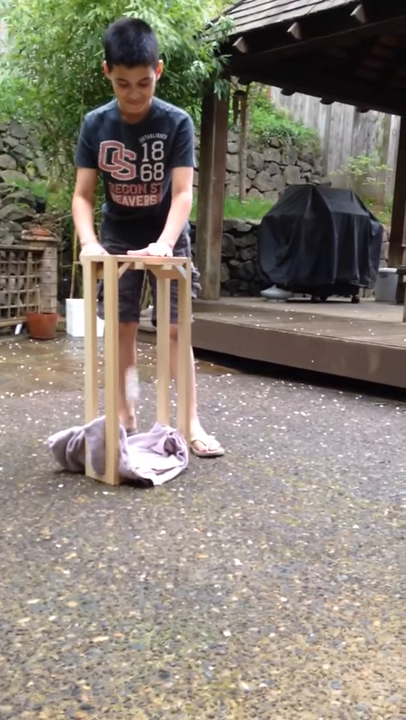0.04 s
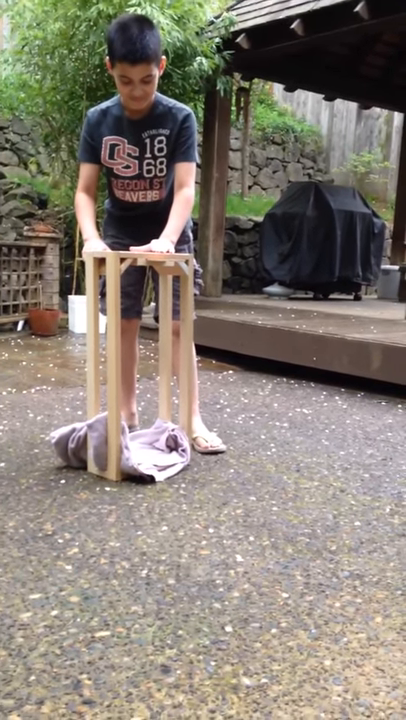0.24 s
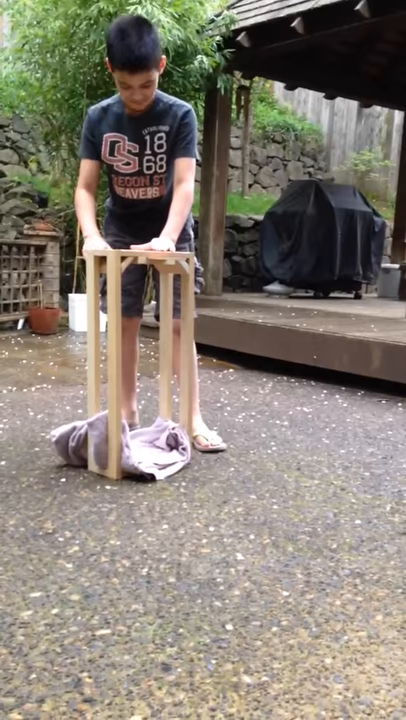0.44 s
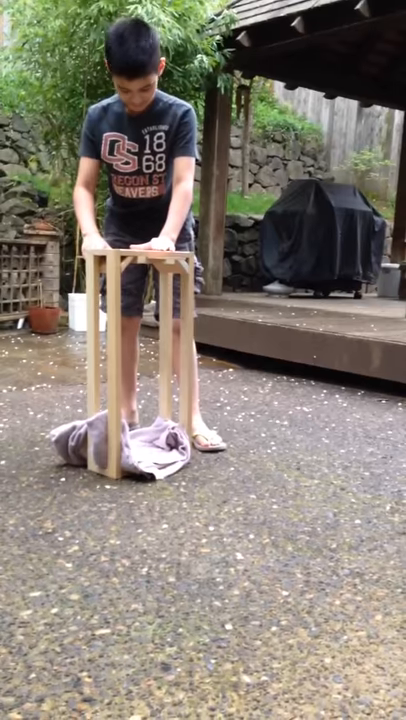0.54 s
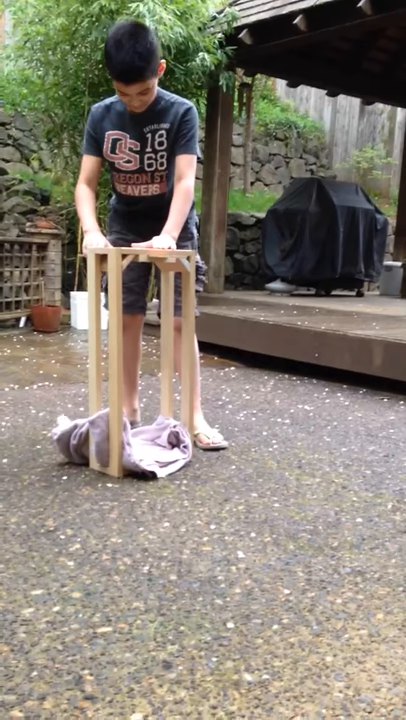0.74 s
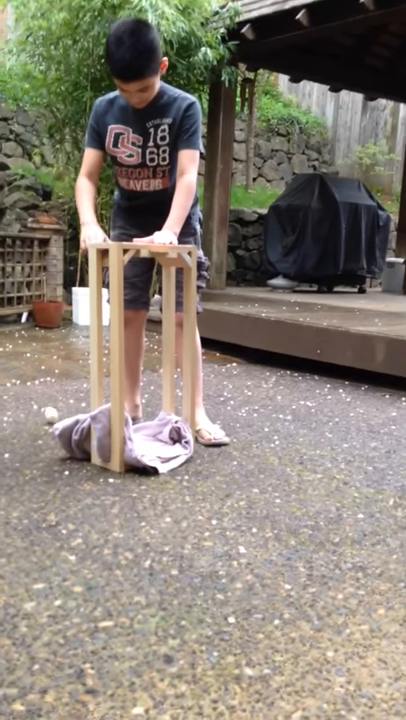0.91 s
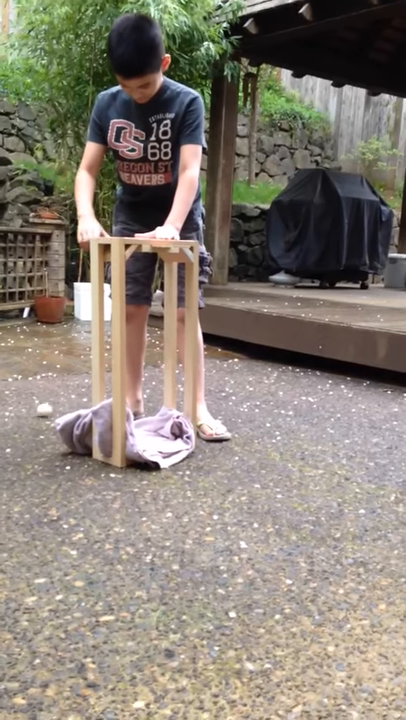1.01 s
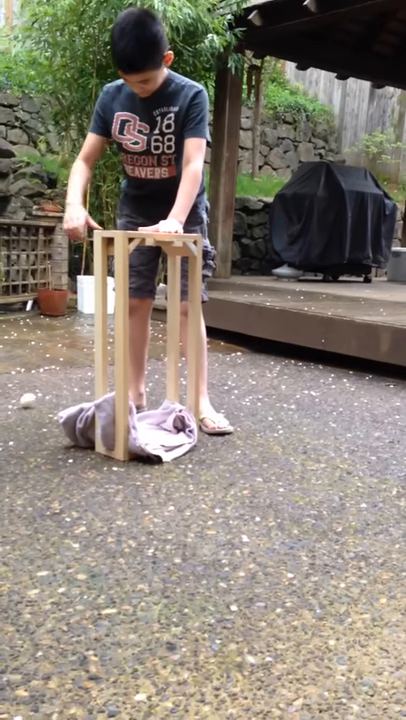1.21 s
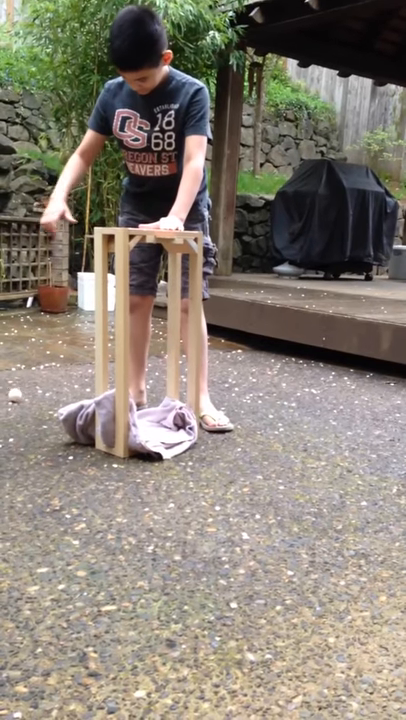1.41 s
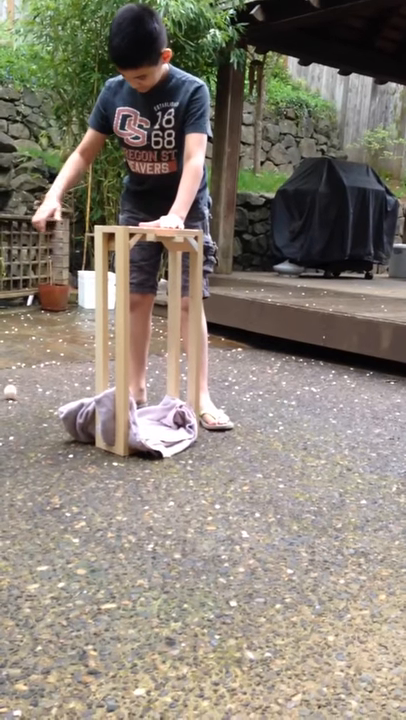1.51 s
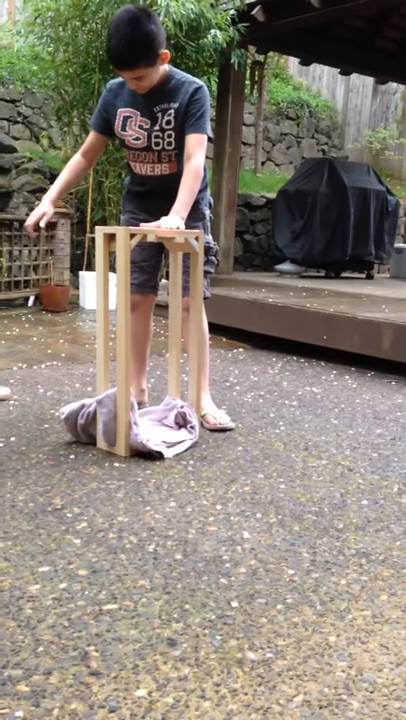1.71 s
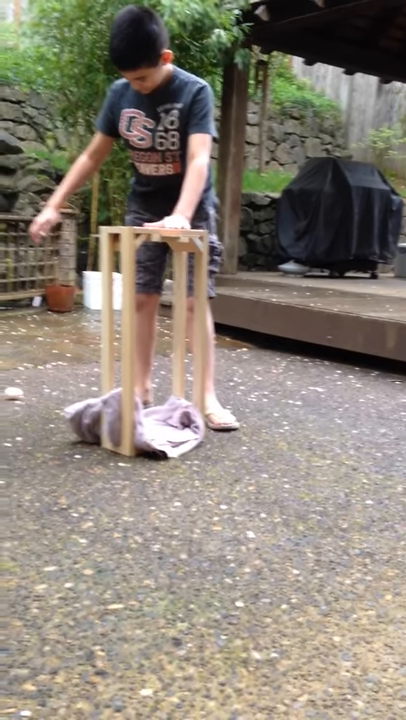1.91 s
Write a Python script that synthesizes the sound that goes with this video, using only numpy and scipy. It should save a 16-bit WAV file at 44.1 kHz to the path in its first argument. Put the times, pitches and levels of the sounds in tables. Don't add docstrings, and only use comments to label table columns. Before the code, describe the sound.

An egg drops through a wooden frame onto a towel with one loud, dull woody knock, then bounces with a bright gritty crack and rolls off over rough patio in fainter ticks, heard outdoors by one microphone.

```python
import sys
import numpy as np
from scipy import signal
from scipy.io import wavfile

SR = 44100
rng = np.random.default_rng(int(sys.argv[2]) if len(sys.argv) > 2 else 0)


def file_out(sig):
    cols = np.atleast_2d(sig).T
    lim = np.clip(cols, -1, 1)
    pcm = np.round(lim * 32767).astype(np.int16)
    wavfile.write(sys.argv[1], SR, pcm)


def volts(x):
    e = np.asarray(x, float) / 20
    return 10 ** e


N = 85995


def in_time(rows):
    t_s, *columns = np.transpose(rows)
    return [np.interp(np.arange(N) / SR, t_s, column) for column in columns]


def rms_one(x):
    return x / np.sqrt(np.mean(x ** 2) + 1e-20)


def drift(rate_hz):
    pole = np.exp(-80 * np.pi * rate_hz / SR)
    white = rng.standard_normal(N // 40 + 2002)
    slow = signal.lfilter([1], [1, -2 * pole, pole * pole], white)[2000:]
    return np.interp(np.arange(N) / 40, np.arange(len(slow)), rms_one(slow - slow.mean()))


def ring(clicks, hz, t60_s):
    r = 10 ** (-3 / (t60_s * SR))
    w = 2 * np.pi * hz / SR
    return signal.lfilter([0, np.sin(w)], [1, -2 * r * np.cos(w), r * r], clicks + 1e-18)


def band(x, low_hz, high_hz):
    edges_hz = [low_hz, min(high_hz, 0.45 * SR)]
    return signal.sosfilt(signal.butter(2, edges_hz, "band", fs=SR, output="sos"), x)


def dying(start_s, t60_s, rise_s):
    t = np.maximum(np.arange(N) / SR - start_s, 0)
    return (1 - np.exp(-t / rise_s)) * 10 ** (-3 * t / t60_s)


def place(t_s, gains):
    out = np.zeros(N + SR)
    np.add.at(out, np.round(np.asarray(t_s) * SR).astype(int), gains)
    return out[:N]


# t/s, grit peak level/dB, shell low level/dB, shell high level/dB, grit centre f/Hz
BOUNCES = [(0.4906, -25, -33, -27, 6060), (0.5058, -32.5, -12, -10.5, 7600),
           (0.5124, -36.5, -3.5, -13, 9390), (0.5392, -46, -1, -4, 7630), (0.6145, -51.5, 7.5, 11.5, 4300),
           (0.6196, -28.5, -15.5, -7.5, 5500), (0.631, -51, -1, -13, 5050), (0.74, -34, -7.5, -1, 8900),
           (0.7526, -42.5, -12, -4, 7700), (0.7688, -37, -5, -8, 7000), (0.8241, -51, 3, -3.5, 3880),
           (0.8343, -39.5, -4.5, -6, 6600), (0.8702, -40.5, -14, -26, 5910),
           (0.9465, -29.5, -31, -5.5, 4130), (0.9858, -47.5, 1, -9, 4940), (1.0075, -54.5, 4, 0, 4130),
           (1.0297, -54, -4, 3.5, 5230), (1.0801, -54.5, 0.5, -1, 6060)]
# t/s, grit peak level/dB, shell low level/dB, shell high level/dB, grit centre f/Hz
ROLL = [(1.117, -38.5, -5, -7, 9900), (1.1394, -43, -1, -3, 6000), (1.1501, -38.5, -9.5, -34, 5900),
        (1.167, -45, -24, -9.5, 4200), (1.2034, -51, -14, -27, 6080), (1.2251, -53, -23, -6, 4700),
        (1.271, -44.5, -22, -15, 6060), (1.285, -46.5, -7, -5, 5070), (1.3028, -40.5, -12, -4, 5400),
        (1.3444, -44.5, -12, -9, 4640), (1.3701, -44.5, -22, -2.5, 4500), (1.3985, -41.5, -19, -3, 4540),
        (1.4208, -43.5, -25, -6, 5140), (1.442, -45.5, -18, -4, 4530), (1.489, -46, -14, -1.5, 5740),
        (1.508, -44, -7, -4, 7020), (1.5288, -39, -19, -16, 6400), (1.6175, -39.5, -52, -8.5, 5950),
        (1.708, -49.5, -13, -5.5, 4550), (1.7421, -40, -10, -13, 4430), (1.8439, -54, -9, -1.5, 3780),
        (1.9153, -45, -7, -11, 3640), (1.9258, -44.5, -14, -10, 3500), (1.9387, -46, -9, -5, 3770)]
# f/Hz, level/dB, T60/s
SHELL_LOW = [(818, 1, 0.014), (415, -6.5, 0.05)]
# f/Hz, level/dB, T60/s
PUSH = [(174, -10, 0.056), (360, -11, 0.026)]
# f/Hz, level/dB, T60/s
SHELL_HIGH = [(1295, -4.5, 0.01), (1710, -0.5, 0.0084), (2353, -0.5, 0.0049), (2890, -9.5, 0.015)]
# f/Hz, width/Hz, level/dB
GRIT = [(4060, 960, -4.5), (5800, 2500, 1.5), (7920, 2400, 2), (9460, 2100, -1), (12400, 3300, -7),
        (14500, 1800, -17)]
LOW_DB, HIGH_DB, GRIT_DB, GRIT_FOCUS_DB = 0.5, 1, -8, 2.5
CRUNCH_S, GRAIN_SPREAD_DB = 0.0029, 12.5
PEBBLE_DB, PEBBLE_CYCLES = -8.5, 8.7


def egg():
    t_s, db, low_db, high_db, centre_hz = np.transpose(BOUNCES + ROLL)
    chance = rng.random((len(t_s), 3, 40))
    late = -np.log(1 - chance[:, 0]) * (np.arange(40) > 0)
    grain_db = GRAIN_SPREAD_DB * (chance[:, 1] - 1) * (late > 0) - 0.98 * late
    signs = np.sign(chance[:, 2] - 0.5)
    sizes = volts(grain_db) * signs
    grain_s = t_s[:, None] + CRUNCH_S * late

    def spray(layer_db, count, shuffle=0):
        flips = np.roll(signs, shuffle, axis=1) if shuffle else np.ones_like(signs)
        gains = volts(db + layer_db)[:, None] * (sizes * flips)[:, :count]
        return place(grain_s[:, :count].ravel(), gains.ravel())

    low = spray(low_db + LOW_DB, count=2)
    high = spray(high_db + HIGH_DB, count=3)
    weight = spray(high_db, count=1)
    out = sum(volts(mode_db) * ring(low, hz, t60_s) for hz, mode_db, t60_s in SHELL_LOW)
    out = out + sum(volts(mode_db) * ring(weight, hz, t60_s) for hz, mode_db, t60_s in PUSH)
    for k, (hz, mode_db, t60_s) in enumerate(SHELL_HIGH):
        out = out + (-1) ** k * volts(mode_db) * ring(high, hz, t60_s)
    for k, hz in enumerate(centre_hz):
        pebble = place(grain_s[k], volts(db[k] + PEBBLE_DB) * sizes[k])
        out = out + ring(pebble, hz, PEBBLE_CYCLES / hz)
    for k, (hz, width_hz, colour_db) in enumerate(GRIT):
        focus_db = -GRIT_FOCUS_DB * np.log2(hz / centre_hz) ** 2
        grains = spray(GRIT_DB + colour_db + focus_db, count=40, shuffle=2 * k + 1)
        out = out + ring(grains, hz, 1.77 / width_hz)
    return out


# t/s, f/Hz, level/dB, T60/s
ACCENTS = [(0.4912, 784, -32, 0.027), (0.4892, 161.8, -40.5, 0.064), (0.4952, 3650, -36, .006),
           (0.4927, 6070, -25, 0.0089), (0.6200, 1980, -36.5, 0.031), (0.6208, 1630, -30.5, 0.014),
           (0.634, 4300, -46, .005), (0.7402, 2370, -34.5, 0.017), (0.9467, 4030, -34, 0.011),
           (0.9473, 1730, -36, 0.011), (1.1398, 1440, -53, 0.023), (1.3028, 1710, -45.5, .025),
           (1.3447, 305, -45, 0.036), (1.3441, 1700, -50, .025), (1.369, 1700, -46, .025),
           (1.3698, 406, -47, 0.037), (1.3698, 2310, -47, 0.024), (1.3982, 1700, -50, 0.023),
           (1.3982, 2300, -53, 0.022), (1.4209, 1740, -50.5, 0.022), (1.4215, 425, -51, 0.036),
           (1.4427, 418, -55, 0.044), (1.49, 1900, -51, 0.029), (1.508, 418, -49.5, 0.088),
           (1.508, 2330, -48, 0.022), (1.6176, 1240, -53, 0.021), (1.742, 1740, -46, .02),
           (1.271, 6800, -52, .006), (1.2844, 1700, -55, 0.022), (1.6168, 4640, -46.5, .006),
           (1.5286, 3290, -48, .008), (1.1498, 6200, -43, .008), (.8705, 5800, -45, .008),
           (1.927, 3500, -58, .01)]


def accents():
    return sum(volts(db) * ring(place([t_s], 0.95), hz, t60_s) for t_s, hz, db, t60_s in ACCENTS)


# t/s, level/dB, hardness/dB per octave
KNOCKS = [
    (0.2291, -33, 0),
    (0.2336, -7, -0.5),
    (0.23533, -10, 3),
    (0.23726, -9.5, 1),
    (.23919, -9, 0),
    (0.2412, -20, -4),
]
# f/Hz, level/dB, T60/s
FRAME = [(327, -42, 0.03), (513.6, -6.5, 0.026), (590, -13, 0.036), (690, -18.5, 0.028), (740, -9, 0.012),
         (1040, -17.5, 0.021), (1116, -42, 0.25), (1230, -13.5, 0.015), (1440, -16, 0.018),
         (1545, -16, 0.034), (1598, -47, 0.38), (2020, -32, 0.011), (2400, -22, 0.018), (2870, -40, 0.014)]
# f/Hz, level/dB, T60/s
LANDING_TAIL = [(154, -45.5, 0.29), (320.6, -36.5, 0.064), (494, -28, 0.14), (688, -30.5, 0.13),
                (1070, -32, 0.16), (1430, -34, 0.15), (2160, -38, 0.11), (3500, -44, 0.071)]
CONTACT_HZ, CRACK_DB, CRACK_S = 2390, -27, 0.0047
TAIL_WIDTH, LATE_TAIL_DB, LATE_TAIL_STRETCH = 1.145, -15.5, 3.76


def landing():
    t_s, db, hard_db = np.transpose(KNOCKS)
    hit_s = t_s[1]
    wood = 0
    for hz, mode_db, t60_s in FRAME:
        knocks = place(t_s, volts(db + mode_db + hard_db * np.log2(hz / 700)))
        wood = wood + ring(knocks, hz, t60_s)
    wood = band(band(wood, 272, CONTACT_HZ), 254, 3900)
    noise = rng.standard_normal((2, N))
    crack = volts(CRACK_DB) * band(noise[0], 2300, 5940) * dying(hit_s, 7 * CRACK_S, 0.0011)
    tail = 0
    for k, (hz, tail_db, t60_s) in enumerate(LANDING_TAIL):
        fast = dying(hit_s, t60_s, 0.0022)
        slow = volts(LATE_TAIL_DB) * dying(hit_s, LATE_TAIL_STRETCH * t60_s, 0.0038)
        hiss = rms_one(band(noise[k % 2], hz / TAIL_WIDTH, hz * TAIL_WIDTH))
        tail = tail + volts(tail_db) * hiss * (fast + slow)
    return wood + crack + tail


# f/Hz, level/dB, T60/s
THUMP = [(151, -27, 0.069), (302, -24.5, 0.046), (89, -42, 0.091), (1203, -17.5, 0.034), (748, -19.5, .03)]
# f/Hz, level/dB, T60/s
DECK = [(501, -44.5, 0.46), (602, -55, .45), (1082, -54, 0.82), (1180, -54.5, 0.99), (1202, -50, 0.12),
        (1510, -47, 0.4), (1600, -44, 0.51), (1000, -38, 0.24)]
DECK_WAVER_DB = 2.5


def deck():
    hit = place([KNOCKS[1][0]], 1.0)
    thump = sum(volts(db) * ring(hit, hz, t60_s) for hz, db, t60_s in THUMP)
    boards = sum(volts(db + DECK_WAVER_DB * drift(24)) * ring(hit, hz, t60_s) for hz, db, t60_s in DECK)
    return thump + boards


SKID_DB, SKID_T60_S, SKID_HZ = -39, 0.17, 7400


def skid():
    grit = rng.standard_normal(N) * volts(2.8 * rng.standard_normal(N))
    bright = rms_one(band(grit, SKID_HZ / 1.75, SKID_HZ * 1.45))
    return volts(SKID_DB) * bright * dying(BOUNCES[0][0], SKID_T60_S, 0.0015)


# t/s, level/dB
SCRAPE = [
    (.45, -84),
    (.55, -68.5),
    (.95, -77),
    (1.05, -70),
    (1.2, -72.5),
    (1.4, -73),
    (1.55, -76),
    (1.8, -68.5),
    (1.95, -82),
]
SCRAPE_PER_S = 830


def scrape():
    db, = in_time(SCRAPE)
    contacts = rng.random(N) < SCRAPE_PER_S * volts(5.0 * drift(25)) / SR
    sizes = volts(3.9 * np.minimum(rng.exponential(1, N), 4))
    grains = contacts * sizes * rng.choice([-1, 1], N)
    return volts(db) * rms_one(volts(8.5) * band(grains, 444, 860) + band(grains, 1500, 8400))


GROUND_ECHO_S, GROUND_ECHO_DB = 0.0038, -8.5
YARD_DELAY_S, YARD_T60_S, YARD_DB = 0.0054, 0.11, -33
YARD_LATE_T60_S, YARD_LATE_DB = 0.42, -53


def yard(x):
    early = volts(YARD_DB) * dying(YARD_DELAY_S, YARD_T60_S, 0.0021)
    late = volts(YARD_LATE_DB) * dying(YARD_DELAY_S, YARD_LATE_T60_S, 0.013)
    scatter = rng.standard_normal(N) * (early + late)
    answer = scatter + place([0, GROUND_ECHO_S], np.array([1, volts(GROUND_ECHO_DB)]))
    return signal.fftconvolve(x, answer[:SR // 2])[:N]


# t/s, f/Hz, level/dB
ENGINE = [(0.0, 61.6, -40.5), (0.05, 61.7, -53), (0.096, 63, -50.5), (0.118, 62, -57), (0.178, 60.5, -46.5),
          (0.282, 59.1, -40.5), (0.396, 60, -58), (0.46, 59.3, -49.5), (0.542, 57.6, -46.5),
          (0.64, 57.1, -53), (0.776, 57.3, -47), (0.928, 55.95, -45), (1.128, 57.7, -59), (1.14, 58.3, -66),
          (1.194, 57.24, -56.5), (1.444, 57.1, -44), (1.704, 57.46, -46.5), (1.95, 56.8, -55.5)]
# multiple of f, level/dB, wobble/dB
OVERTONES = [(2.0, -66.5, 4)]


def engine():
    hz, db = in_time(ENGINE)
    phase = 2 * np.pi * np.cumsum(hz) / SR
    tone = volts(db) * np.sin(phase)
    for multiple, over_db, wobble_db in OVERTONES:
        level = volts(over_db + wobble_db * drift(14.0))
        tone = tone + level * np.sin(multiple * phase + 0.99 * drift(1.8))
    return np.sqrt(2) * tone


# f/Hz, level/dB per Hz
AIR = [(70, -3.5), (150, -11.5), (300, -25.5), (600, -26.5), (950, -21), (1800, -30.5), (7000, -38.5),
       (14000, -43.5)]
AIR_DB, AIR_PATCHY_DB, AIR_TOP_HZ = -55.5, 0.86, 15700


def air():
    edges_hz = 25 * 2 ** np.arange(0, 9.6, 0.5)
    white = rng.standard_normal((2, N))
    hz, db = np.transpose(AIR)
    out = 0
    for k, (low_hz, high_hz) in enumerate(zip(edges_hz, edges_hz[1:])):
        level_db = np.interp(np.log(low_hz * high_hz) / 2, np.log(hz), db)
        out = out + volts(level_db + AIR_PATCHY_DB * drift(14.5)) * band(white[k % 2], low_hz, high_hz)
    top_cut = signal.cheby2(12, 30, AIR_TOP_HZ, fs=SR, output="sos")
    return volts(AIR_DB) * rms_one(signal.sosfilt(top_cut, out))


def scene():
    patio = yard(egg() + scrape()) + accents() + skid()
    return (patio + landing() + deck() + engine() + air())[None, :]


def low_pass(x):
    return signal.sosfilt(signal.butter(12, 16120, fs=SR, output="sos"), x)


MIC_LOW_HZ, MIC_TOP, CUTOFF_HZ = 44.7, 0.61, 15600


def record(dry):
    rounded = MIC_TOP * np.tanh(dry / MIC_TOP)
    bass_cut = signal.butter(4, MIC_LOW_HZ, "high", fs=SR, output="sos")
    top_cut = signal.cheby2(14, 40, CUTOFF_HZ * 0.995, fs=SR, output="sos")
    mix = signal.sosfilt(top_cut, signal.sosfilt(bass_cut, rounded))
    return low_pass(mix)


dry = scene()
out = record(dry)
file_out(out)
```